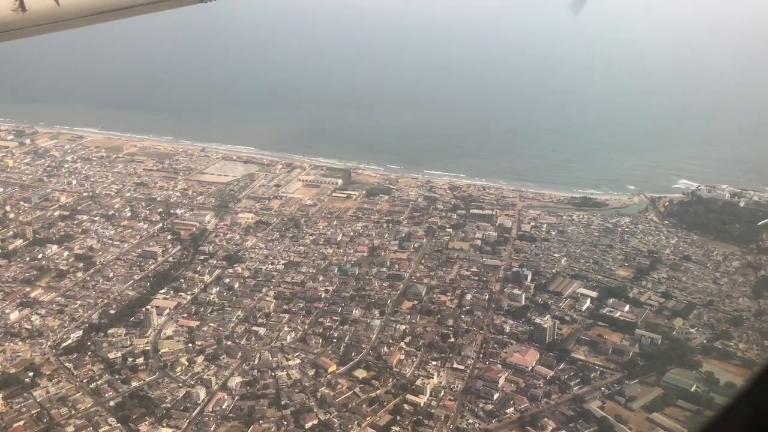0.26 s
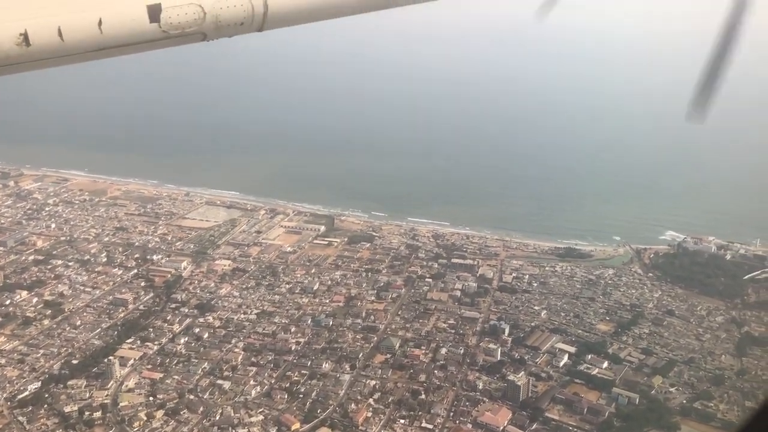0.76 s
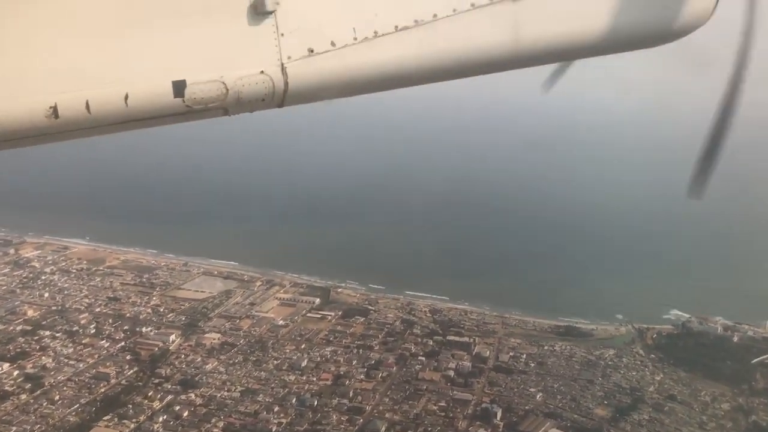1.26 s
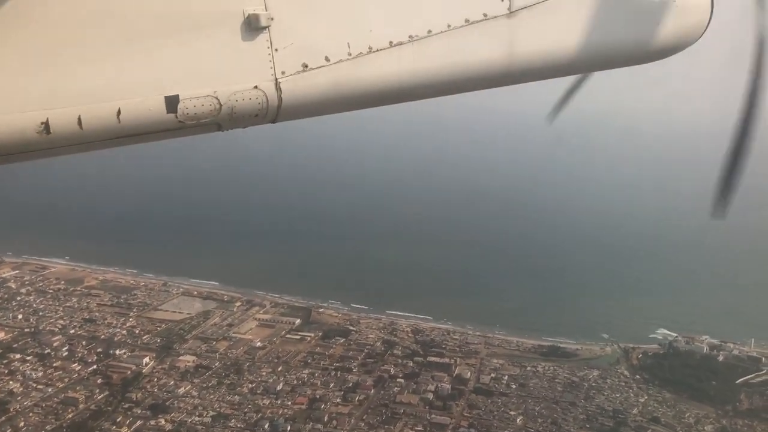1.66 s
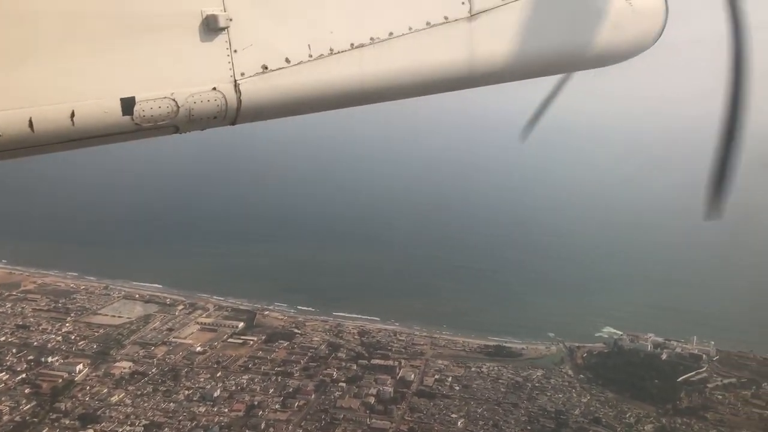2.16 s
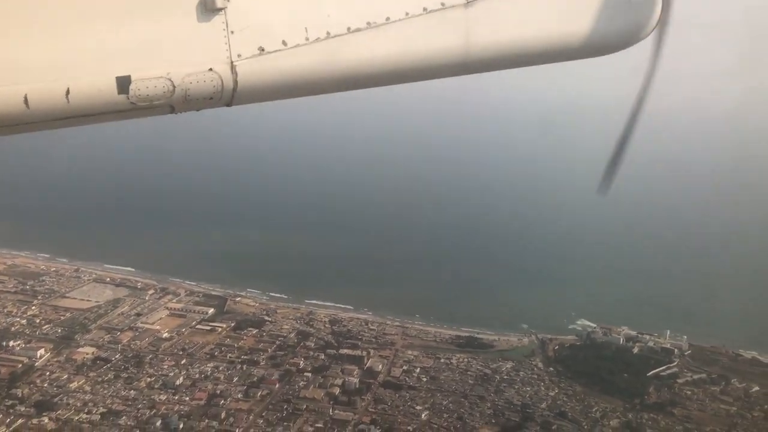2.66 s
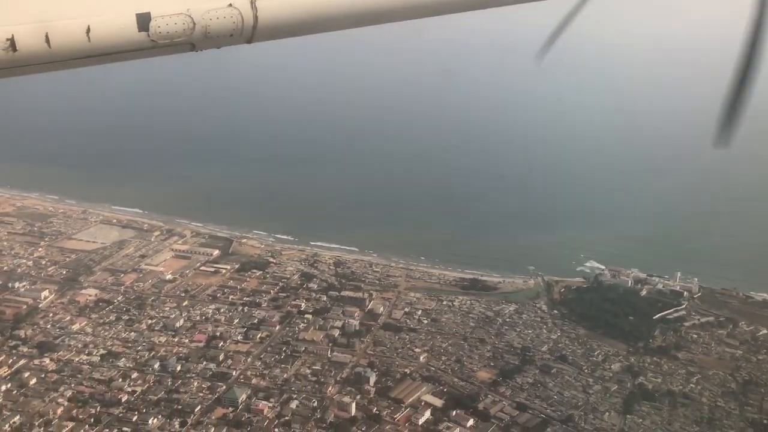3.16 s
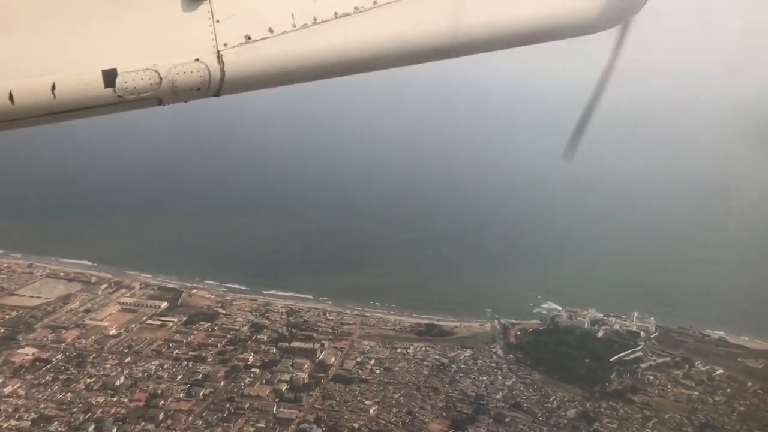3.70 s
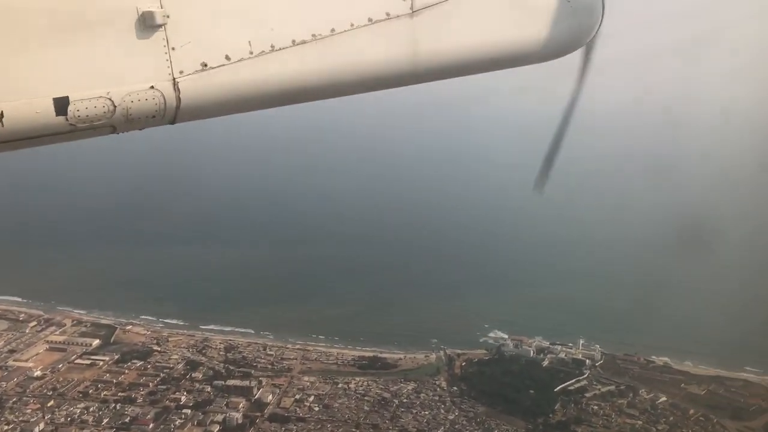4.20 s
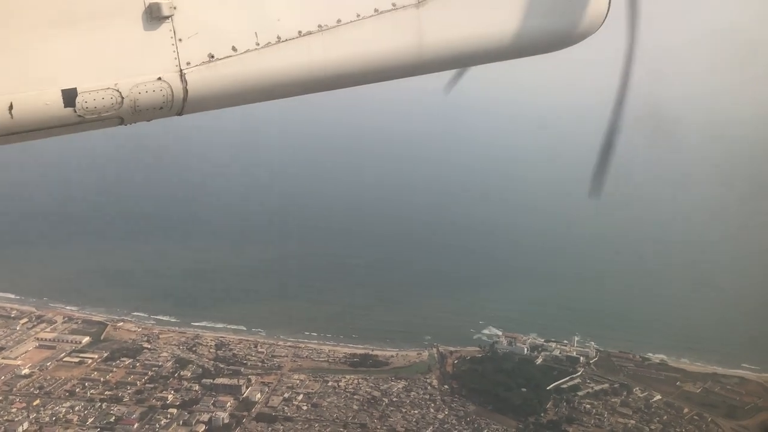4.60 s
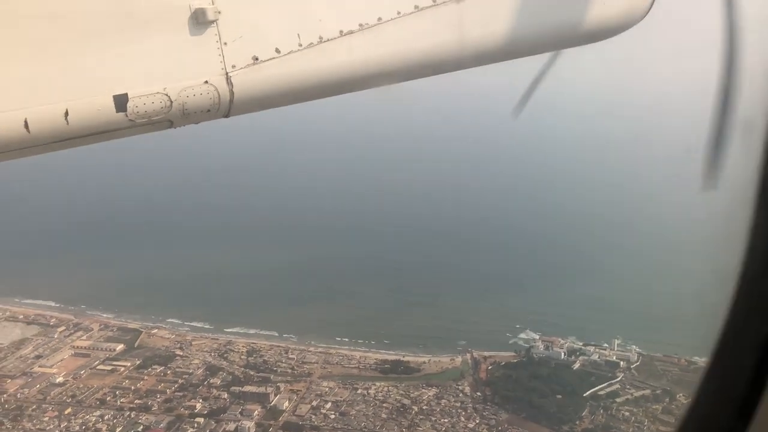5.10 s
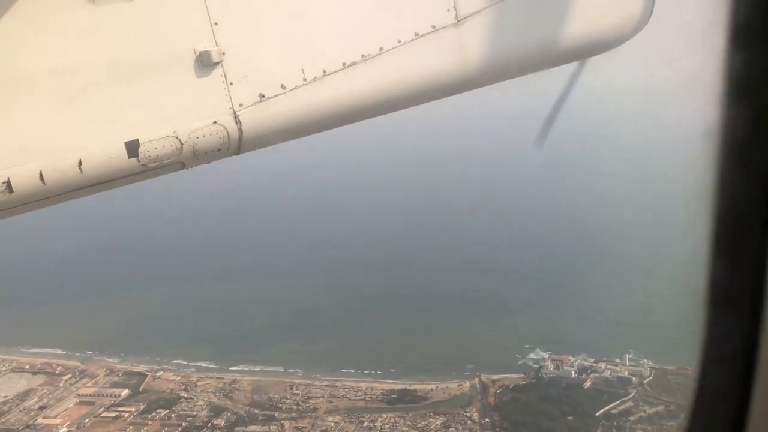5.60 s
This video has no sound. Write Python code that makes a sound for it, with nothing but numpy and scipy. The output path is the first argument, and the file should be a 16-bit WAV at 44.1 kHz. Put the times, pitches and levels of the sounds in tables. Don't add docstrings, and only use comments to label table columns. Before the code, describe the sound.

Inside a propeller aircraft cabin, a deep throbbing engine boom fades within two seconds, leaving steady low roar, airy rush and thin hiss.

```python
import sys
import numpy as np
from scipy import signal
from scipy.fft import rfft, irfft, next_fast_len
from scipy.io import wavfile
from scipy.ndimage import uniform_filter1d, map_coordinates

SR = 44100
rng = np.random.default_rng(int(sys.argv[2]) if len(sys.argv) > 2 else 0)


def generate_wav(sig):
    pcm = np.round(np.clip(np.atleast_2d(sig).T, -1, 1) * 32767).astype(np.int16)
    wavfile.write(sys.argv[1], SR, pcm)


def boost(x):
    u = np.asarray(x, float) / 20
    return 10 ** u


N = 257982

# start_s, blade_rate_hz, blade_tone_db
NEAR_BLADES = [(0.0, 97.83, -11.5), (0.45, 97, -11.5), (0.9, 96.43, -11.5), (1.2, 96, -12.5),
               (1.4, 94.9, -15.5), (1.6, 95.06, -21.5), (1.85, 94.27, -36), (2.3, 93.03, -23.5),
               (2.6, 92.9, -27), (2.9, 91.8, -19.5), (3.2, 91.7, -18.5), (3.6, 90.53, -21),
               (4.0, 89.55, -22), (4.6, 89.67, -22.5), (5.5, 89.48, -19), (5.85, 89.8, -20.5)]


def unit(x):
    return x / np.sqrt(np.mean(x ** 2) + 1e-20)


def curves(rows):
    s, *cols = np.transpose(rows)
    return [np.interp(np.arange(N) / SR, s, c) for c in cols]


def wobble(rate_hz):
    knots = rng.standard_normal(int(N * rate_hz / SR) + 4)
    return map_coordinates(knots, [np.arange(N) * rate_hz / SR])


def filtered(x, gain):
    m = next_fast_len(len(x) + 8192)
    return irfft(rfft(x, m) * gain(np.fft.rfftfreq(m, 1 / SR)), m)[:len(x)]


def hump(hz, centre_hz, width_hz):
    return 1 / np.sqrt(1 + (2 * (hz - centre_hz) / width_hz) ** 2)


def band_unit(x, lo_hz, hi_hz):
    return x / np.std(filtered(x, lambda hz: (hz > lo_hz) & (hz < hi_hz)))


def patches(shape, bins, frames):
    field = uniform_filter1d(rng.standard_normal(shape), size=bins, axis=0)
    return unit(uniform_filter1d(field, size=frames, axis=1))


def turbulence(spectrum, patchy_db, drift_db, peaks=()):
    z = signal.stft(rng.standard_normal(N + 512), nperseg=512)[2]
    eddies_db = patchy_db * patches(z.shape, bins=6, frames=14)
    standing_db = drift_db * patches(z.shape, bins=5, frames=150)
    noise = signal.istft(z * boost(eddies_db + standing_db), nperseg=512)[1][:N]
    f, db = np.transpose(spectrum)

    def colour(hz):
        lift_db = sum((d * hump(hz, c, w) ** 2 for c, w, d in peaks), 0 * hz)
        return boost(np.interp(np.log(hz + 1), np.log(f), db) + lift_db)

    return filtered(noise, colour)


def tone(phase, db, unsteady_db):
    return np.sqrt(2) * boost(db + unsteady_db * wobble(5)) * np.cos(phase)


def gain_db():
    start_s, rise_s, rise_db = 1.62, 0.74, 4.5
    u = np.clip((np.arange(N) / SR - start_s) / rise_s, 0, 1)
    return rise_db * (1 - np.cos(np.pi * u)) / 2


def layer_db(start_db, gain_share, close_db):
    # start_s, nearness_0_to_1
    lean = [
        (0, 0.1),
        (1.8, 0),
        (2.9, .45),
        (4.15, 0.98),
        (4.9, 0.5),
        (5.85, 0.5),
    ]
    return start_db + gain_share * gain_db() + close_db * curves(lean)[0]


def grips():
    # start_s, whistle_hz, shading_above_6400_hz_db, cavity_db
    holds = [
        (0, 3737, -0.5, -1),
        (1.9, 3620, -0.5, -0.5),
        (2.749, 3684, -2.5, -5),
        (3.65, 3593, .5, 8),
        (5.0, 3930, 0.5, -6),
    ]
    shift_s = 0.34
    s, *cols = np.transpose(holds)
    held = np.maximum(np.searchsorted(s, np.arange(N) / SR) - 1, 0)
    return [uniform_filter1d(c[held], size=int(shift_s * SR), mode="nearest") for c in cols]


def blade_phase():
    return 2 * np.pi * (np.cumsum(curves(NEAR_BLADES)[0]) / SR - .07)


def hull_db(hz):
    # centre_hz, width_hz, level_db
    modes = [(182.07, 11.9, -30), (194.7, 7, -33), (269.4, 14.3, -28), (286.8, 14, -36.5),
             (358.8, 18.6, -28.5), (377.7, 6, -36), (388.2, 16, -40.5)]
    return gain_db() + 20 * np.log10(sum(boost(db) * hump(hz, c, w) ** 2 for c, w, db in modes))


def near_propeller(blades, roar_db):
    # blade_multiple, fast_db, slowed_db (both re roar)
    weak_orders = [(5, -23, -15), (6, -22, -23), (7, -27, -25), (8, -26, -27), (9, -30, -36),
                   (10, -44, -26), (11, -46, -38), (12, -39, -35), (13, -46, -42)]
    loose_db, settle_db_per_s = -22.5, 36
    rate_hz, boom_db = curves(NEAR_BLADES)
    order_db = {1: boom_db}
    for k in (2, 3, 4):
        order_db[k] = hull_db(k * rate_hz)
    order_db[3] = np.maximum(order_db[3], loose_db - settle_db_per_s * np.arange(N) / SR)
    out = np.zeros(N)
    for k, db in order_db.items():
        bend_rad = -.7 * (k - 2.3) ** 2
        out += tone(k * blades + bend_rad, db, unsteady_db=.5 if k == 1 else 1.3)
    slowed = np.clip((94 - rate_hz) / 4, 0, 1)
    for k, fast_db, slow_db in weak_orders:
        db = roar_db + fast_db + slowed * (slow_db - fast_db)
        out += tone(k * blades + .5 * wobble(3), db, unsteady_db=2.5)
    return out


def far_propeller(roar_db):
    # blade_multiple, level_re_roar_db
    orders = [(1, -16), (4, -9.5), (5, -17), (6, -21), (7, -32), (8, -27), (9, -30), (10, -31), (12, -36),
              (24, -48)]
    blade_hz = 85.2
    turn = 2 * np.pi * np.arange(N) / SR
    out = np.zeros(N)
    for k, db in orders:
        out += tone(k * blade_hz * turn + .25 * k ** .5 * wobble(2.5), roar_db + db, unsteady_db=2.5)
    return out


def gearboxes(roar_db):
    # pitch_hz, level_db
    whines = [(2396, -72), (2487, -71)]
    turn = 2 * np.pi * np.arange(N) / SR
    out = np.zeros(N)
    for hz, db in whines:
        out += tone(hz * turn + 1.2 * wobble(2.5), db - 1 + 1.6 * (roar_db + 25.5), unsteady_db=1.5)
    return out


def boundary_roar(roar_db):
    # freq_hz, density_db_per_hz
    roar_spectrum = [(15, -50), (30, -35), (45, -26.5), (60, -4), (85, -6.5), (130, 2), (195, -5),
                     (245, -8.5), (300, -3), (375, -4.5), (440, -13), (530, -17.5), (680, -32.5),
                     (1000, -72)]
    return boost(roar_db) * band_unit(turbulence(roar_spectrum, patchy_db=.6, drift_db=.3), 105, 165)


def wall_rush():
    # freq_hz, density_db_per_hz
    rush_spectrum = [(300, -33), (600, 2.5), (750, 3), (1000, 1), (1200, -3), (1700, -6.5), (2100, -8),
                     (2650, -17), (3100, -12.5), (4300, -23), (6000, -50)]
    # centre_hz, width_hz, lift_db
    wall_modes = [(970, 39, -1.5), (1390, 270, 6), (2520, 120, 2)]
    level_db = layer_db(-53.5, gain_share=0.83, close_db=4.2) + 0.45 * wobble(7.2)
    noise = turbulence(rush_spectrum, patchy_db=0.38, drift_db=1.0, peaks=wall_modes)
    return boost(level_db) * band_unit(noise, 934, 2600)


def thin_hiss():
    # freq_hz, density_db_per_hz
    hiss_spectrum = [(2500, -30), (4300, -2), (5000, -3), (6200, -3.5), (7600, -4), (8400, -9), (9600, -15),
                     (11500, -45)]
    # centre_hz, width_hz, lift_db
    gap_modes = [(5430, 500, 2.5)]
    level_db = layer_db(-68.1, gain_share=0.44, close_db=2.6) + .3 * wobble(7)
    noise = turbulence(hiss_spectrum, patchy_db=.9, drift_db=1.1, peaks=gap_modes)
    hiss = boost(level_db) * band_unit(noise, 4600, 8200)
    top = filtered(hiss, lambda hz: 1 / (1 + (6400 / (hz + 1)) ** 12))
    return hiss + (boost(grips()[1]) - 1) * top


def window_whistle():
    breath_i, breath_q = [filtered(rng.standard_normal(N), lambda hz: hump(hz, 0, 330) ** 1.5) for _ in "iq"]
    glide = 2 * np.pi * np.cumsum(grips()[0]) / SR
    whistle = unit(breath_i * np.cos(glide) + breath_q * np.sin(glide))
    level_db = layer_db(-68.5, gain_share=.8, close_db=8)
    return boost(level_db + 0.69 * wobble(9.6) + 1.5 * wobble(40)) * whistle


def high_sizzle():
    # freq_hz, density_db_per_hz
    sizzle_spectrum = [(5000, -30), (8300, -1), (10000, 0), (11500, -3.5), (12800, -4.2), (13900, -3.2),
                       (15500, -6.5), (20000, -12)]
    level_db = layer_db(-72.7, gain_share=.1, close_db=2.2) + .5 * wobble(8)
    return boost(level_db) * band_unit(turbulence(sizzle_spectrum, patchy_db=1.2, drift_db=.7), 9000, 15500)


def pane_cavity():
    level_db = layer_db(-75, gain_share=0.81, close_db=2.5) + grips()[2]
    return boost(level_db) * unit(filtered(rng.standard_normal(N), lambda hz: hump(hz, 2880, 400) ** 2))


def wall_panel():
    ring = filtered(rng.standard_normal(N), lambda hz: hump(hz, 852, 170) ** 3)
    return boost(layer_db(-50, gain_share=1.3, close_db=1)) * unit(ring)


def buzz_gain(rows):
    catch_s, let_go_s, tire_db_per_s, idle_db = .03, 0.1, 3, -89.5
    t = np.arange(N) / SR
    out = boost(idle_db)
    for s, length_s, db in rows:
        gate = np.clip((t - s) / catch_s, 0, 1) * np.clip((s + length_s - t) / let_go_s, 0, 1)
        out = out + boost(db - tire_db_per_s * (t - s)) * gate
    return out


def loose_trim(blades):
    # centre_hz, width_hz
    pieces = [(6800, 380), (7550, 550)]
    # start_s, length_s, level_db
    buzz_spells = [
        [(0, 1.5, -73), (5.19, .6, -75.5)],
        [(1.5, 1.085, -78), (3.7, .3, -79), (5.19, 0.62, -71)],
    ]
    taps = np.exp(2.3 * (np.cos(blades) - 1))
    out = np.zeros(N)
    for (hz, width_hz), rows in zip(pieces, buzz_spells):
        chatter = taps * boost(1.4 * wobble(45)) * rng.standard_normal(N)
        ring = filtered(chatter, lambda f: hump(f, hz, width_hz) ** 2 + .09 * hump(f, 10000, 5000) ** 2)
        out += buzz_gain(rows) * unit(ring)
    return out


def phone_brushes():
    # centre_s, length_s, level_db, centre_hz, width_hz
    puffs = [(.432, .014, -66.5, 10200, 5000), (.862, .017, -70, 9800, 3500),
             (1.47, .006, -73, 11000, 8000), (2.22, .012, -71, 7300, 2000), (2.54, .012, -61, 3200, 1500),
             (2.555, .006, -71, 11000, 8000), (2.855, .01, -67, 12000, 7000),
             (3.096, .015, -64, 11500, 9000), (4.99, .035, -69.5, 13500, 6000),
             (5.045, .02, -69, 12500, 7000), (5.19, .006, -65, 10500, 9000)]
    out, t = np.zeros(N), np.arange(N) / SR
    grain = boost(2.5 * wobble(250))
    for s, length_s, db, hz, width_hz in puffs:
        near = slice(int((s - .2) * SR), int((s + .2) * SR))
        puff = unit(filtered(rng.standard_normal(N)[near], lambda f: hump(f, hz, width_hz) ** 3))
        out[near] += boost(db) * np.exp(-((t[near] - s) / length_s) ** 4) * puff
    return grain * out


def scene():
    blades = blade_phase()
    roar_db = layer_db(-30.5, gain_share=1.01, close_db=0)
    engines = near_propeller(blades, roar_db) + far_propeller(roar_db) + gearboxes(roar_db)
    airflow = boundary_roar(roar_db) + wall_rush() + thin_hiss() + window_whistle()
    cabin = high_sizzle() + pane_cavity() + wall_panel() + loose_trim(blades)
    return (engines + airflow + cabin + phone_brushes())[None]


def roll_off(x):
    return signal.sosfilt(signal.butter(12, 15700, fs=SR, output="sos"), x)


def record(dry):
    return roll_off(dry)


dry = scene()
out = record(dry)
generate_wav(out)
```